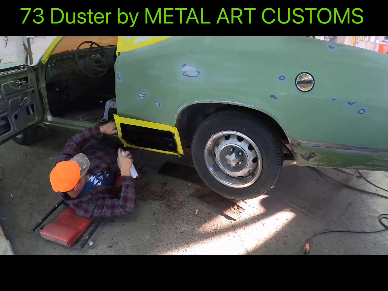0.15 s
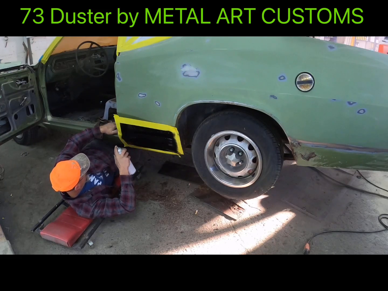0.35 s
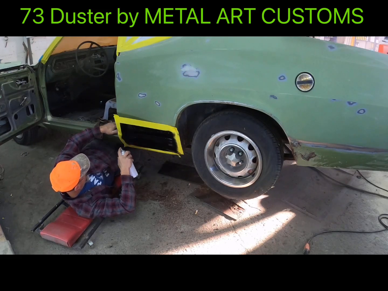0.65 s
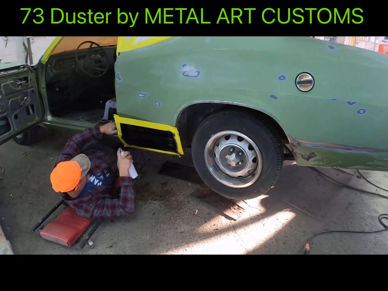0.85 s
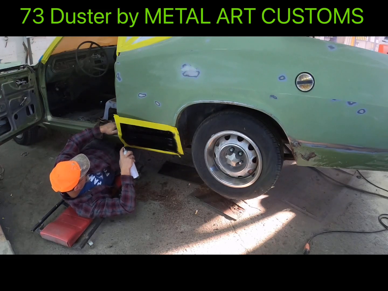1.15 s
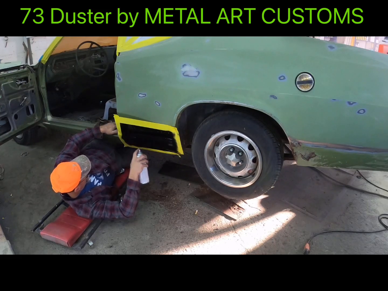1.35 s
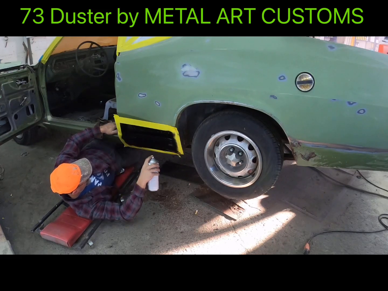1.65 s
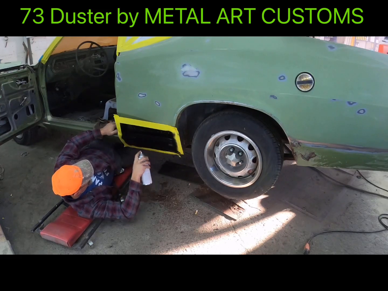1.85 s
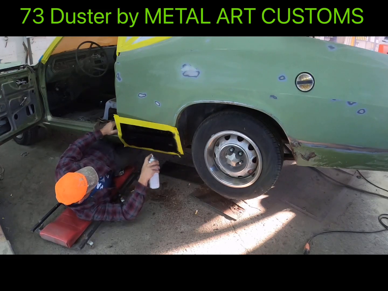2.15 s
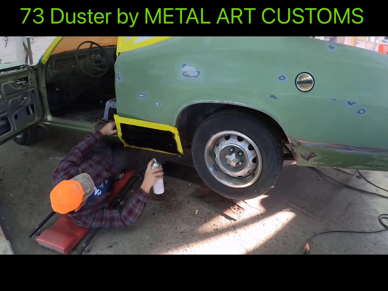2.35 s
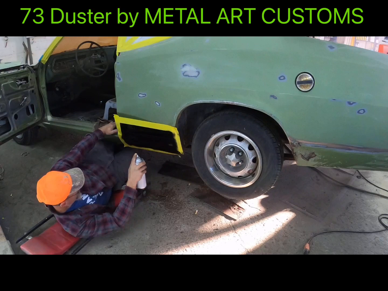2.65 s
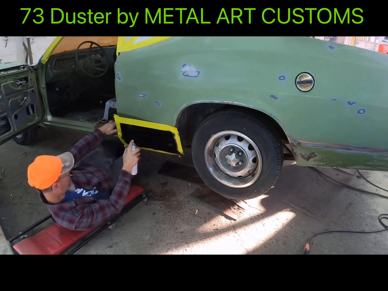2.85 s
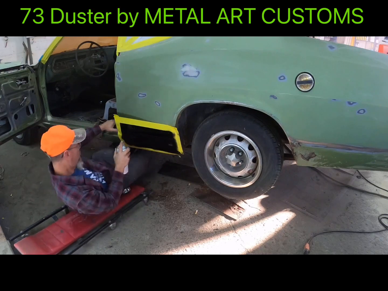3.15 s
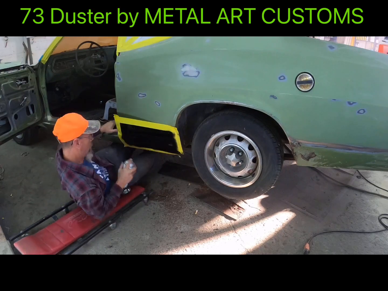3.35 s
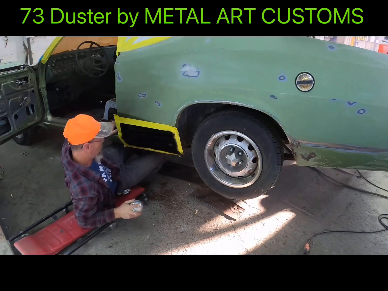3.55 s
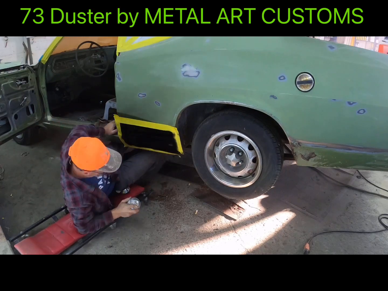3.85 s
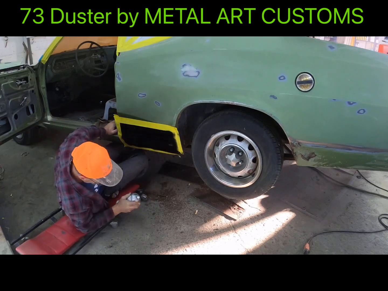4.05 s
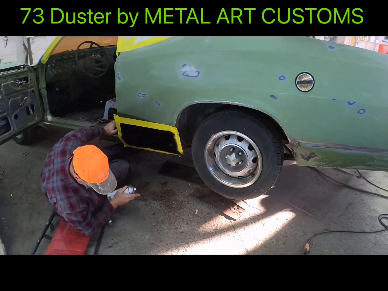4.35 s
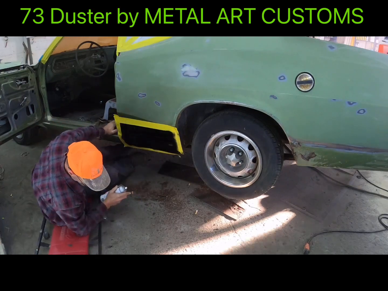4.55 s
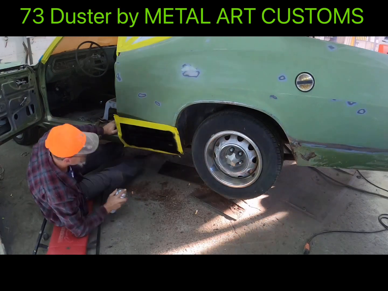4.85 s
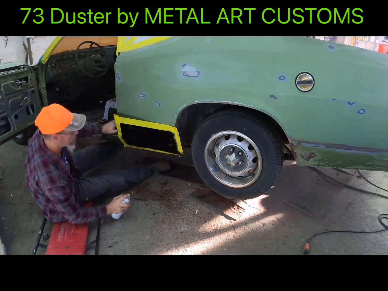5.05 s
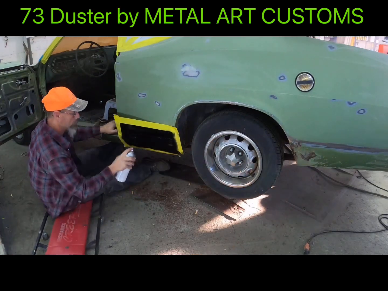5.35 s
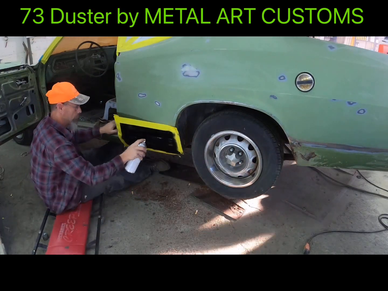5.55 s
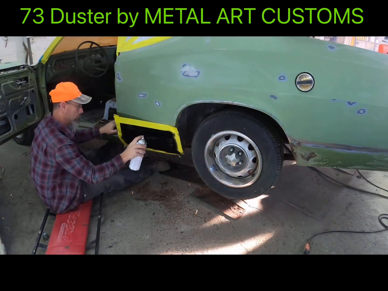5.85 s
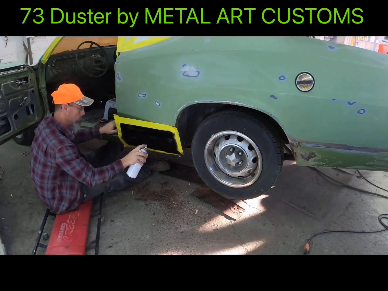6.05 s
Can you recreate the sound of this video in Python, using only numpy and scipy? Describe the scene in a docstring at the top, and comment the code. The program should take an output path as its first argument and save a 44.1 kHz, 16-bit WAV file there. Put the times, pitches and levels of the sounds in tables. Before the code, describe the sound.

Aerosol puffs between quiet pauses, two loud bouts of caster rumble and knocks on gritty floor, a hollow clack, steel chatter, three final sprays.

```python
"""Spray-can bursts on a car's side panel in a hard-walled garage: noise coloured by jet and panel, gated by a valve.
Between them a mechanic's creeper rolls on gritty concrete: random jolts through its board, bumps and drones.
Its frame knocks, scrapes and ticks as clusters of damped modes; a hollow part clacks and steel clangs as damped sines.
The car body booms in low wavering sines. Behind lie room noise, mains hum, puffs of draught and a soft hiss."""
import sys
import numpy as np
from scipy import signal
from scipy.fft import rfft, irfft, next_fast_len
from scipy.io import wavfile
from scipy.ndimage import uniform_filter1d, map_coordinates

SR = 44100
rng = np.random.default_rng(int(sys.argv[2]) if len(sys.argv) > 2 else 0)


def store_wav(level_fs):
    """Save 16-bit WAV to argv[1]."""
    pcm = np.round(np.clip(np.atleast_2d(level_fs), -1, 1) * 32767)
    wavfile.write(sys.argv[1], SR, pcm.T.astype(np.int16))


N = 272959

# microphone ports: f/Hz, left minus right/dB
PORT_SHADING = [(50, 11.5), (130, -2), (400, -3), (1100, 0.5), (2700, 3), (5300, 0.5), (7600, 3.5),
                (8500, -3.5), (9400, -2.5), (11000, -1), (15000, -4)]
# fading top of the microphones: f/Hz, level/dB
MIC_TREBLE = [(12500, -1.5), (13300, -7), (14200, -15), (15800, -21)]
# walls' decay: f/Hz, t60/s
WALL_DECAY = [(80, 0.94), (250, 0.68), (1000, 0.95), (4000, 0.68), (8000, 0.41), (14000, 0.2)]
# diffuse sound, left-right correlation: f/Hz, likeness/1
LIKENESS = [(100, 0.53), (500, 0.94), (1500, 0.71), (3500, 0.43), (6000, 0.048), (14000, 0.067)]
# room noise spectrum: f/Hz, density/dB per Hz
ROOM_COLOUR = [(20, -24), (40, -24), (60, -3), (90, -20), (140, 0), (240, -13), (550, -27), (1500, -12.5),
               (4000, -41)]
# soft hiss spectrum: f/Hz, density/dB per Hz
HISS_SPECTRUM = [(410, -7.5), (700, -8), (766, -14), (848, 0), (1630, 2), (3020, 3.5), (6950, -5),
                 (12400, -23.5), (15000, -26)]
# draught on the microphones: t of peak/s, level/dB
DRAUGHT_PUFFS = [(.66, -42.5), (1.25, -35), (2.34, -46)]
# leaned-on car panel: t of start/s, t of end/s, level/dB, pitch f/Hz
PANEL_BOOMS = [(0.645, 0.685, -42, 67.5), (0.858, 0.954, -30.5, 147.5), (0.868, 1.015, -28.5, 81.7),
               (1.125, 1.154, -37.5, 69), (1.262, 1.303, -35.5, 160.7), (4.085, 4.149, -37, 127),
               (5.085, 5.13, -37, 116)]
# panel modes: multiple of pitch/1, level/dB
PANEL_MODES = [(1, 2.5), (1.42, -13.5)]
# steel contacts: t/s, ring level/dB (6 dB is taken off in clang), clash level/dB
STEEL_CONTACTS = [(5.0744, -35, -22.5), (5.094, -35, -24.5), (5.107, -38, -25.5), (5.132, -41, -35),
                  (5.15, -55, -38), (5.197, -46.5, -40), (5.246, -43, -30.5), (5.395, -57, -40)]
# steel modes: f/Hz, mean level/dB, t60/s
STEEL_MODES = [(846, -1, 0.48), (922.8, 9, 0.57), (990, 3.5, 0.58), (1031, -3, 0.96), (1053, -1, 0.77),
               (1125, 1, 0.76), (1152, -2.5, 0.87), (1223, -3, 0.61), (1320, -1, .6), (1378, -5, 0.79),
               (1434, 1, .7), (1549, -3, 0.5), (1563, -1.5, 0.73), (2040, -12, .3), (2116, 4, 0.32),
               (2320, 1, 0.39), (2345, -1, .42), (2492, -9, .28), (2900, -3, .45), (3246, -17, .6),
               (3670, -14, .55)]
# steel clash spectrum: f/Hz, density/dB per Hz
CLASH_COLOUR = [(100, -16), (620, -6.5), (950, 0.5), (2400, -6), (4800, -10), (7000, -18), (12000, -24.5),
                (15500, -27)]
# hollow part against the floor: t/s, level/dB
CLACK_CONTACTS = [(4.0697, -13.5), (4.076, -24), (4.091, -21)]
# hollow part's modes: mean f/Hz, level/dB, t60/s
HOLLOW_MODES = [(205, -5, 0.05), (444, -7.5, 0.077), (705, -11, 0.036), (864, -8.5, 0.047),
                (1003, -6, 0.038), (1158, -3.5, 0.051), (1295, -4, 0.032), (1430, -8, 0.029),
                (3310, -14, .015), (5500, -14, .015)]
# small hard parts touching: t/s, level/dB, centre f/Hz, width/octaves
TICK_CONTACTS = [(2.734, -27, 3000, 1), (2.764, -24, 2600, 1.2), (2.872, -28, 3200, 1),
                 (3.156, -26, 4050, 1.05), (3.234, -29, 5000, .5), (3.843, -30, 6900, 1),
                 (3.851, -17.5, 6350, 0.84), (3.886, -43, 7500, .8), (4.1761, -19, 1725, 0.74),
                 (4.184, -17.5, 1300, 1.1), (4.364, -19.5, 3500, 1.9), (4.627, -28.5, 5200, 2.1),
                 (4.7826, -28.5, 3600, 2.3), (4.806, -27.5, 3300, 0.58), (4.912, -32.5, 2490, 1)]
# frame dragging on concrete: t/s, level/dB, rise/s
FRAME_SCRAPES = [(2.71, -30, 0.011), (2.731, -22.5, 0.0023), (2.897, -28.5, .003), (4.308, -29, 0.0019),
                 (4.345, -24, 0.009), (4.363, -24, 0.0033), (4.383, -28, 0.01), (4.806, -30.5, 0.0017)]
# frame and caster contacts: t/s, level/dB, centre f/Hz, width/octaves
FRAME_KNOCKS = [(2.483, -33.5, 1500, 1.5), (2.568, -33, 645, .4), (2.612, -26.5, 1400, 2.4),
                (2.756, -24, 1900, 3.6), (2.852, -19, 3200, 0.11), (3.82, -18, 860, 2.27),
                (3.843, -22.5, 760, 3.4), (3.913, -30.5, 2010, 1.4), (4.177, -25.5, 600, 1),
                (4.396, -20.5, 704, 3.2), (4.445, -23, 2800, 2.6), (4.781, -29.5, 2020, 2.8),
                (4.937, -30.5, 1440, 0.69)]
# juddering caster: t of peak/s, level/dB, mean pitch f/Hz, tenfold rise/s, tenfold fall/s
CASTER_DRONES = [(2.545, -31, 310, .04, .08), (2.648, -19, 345, 0.067, 0.064),
                 (2.775, -20, 440, 0.066, 0.054), (2.862, -19.5, 222, 0.12, 0.034),
                 (4.42, -19.5, 182, 0.05, 0.072), (4.44, -23.5, 615, 0.06, 0.055),
                 (4.488, -16.5, 183.7, 0.17, 0.11), (4.565, -20.5, 240, 0.035, 0.087)]
# caster into a dent or over a ridge: t/s, level/dB
CASTER_BUMPS = [(2.55, -24), (2.628, -21), (2.642, -17), (2.757, -15.5), (2.771, -15), (2.835, -18),
                (2.856, -15.5), (2.957, -20.5), (2.995, -21), (4.4, -12), (4.423, -14), (4.459, -11.5),
                (4.478, -12.5), (4.493, -9), (4.511, -18), (4.556, -11.5)]
# creeper shoves: t of top speed/s, tenfold run-up/s, tenfold coast/s, rumble level/dB, rattle over rumble/dB
CREEPER_SHOVES = [(.47, 0.23, 0.73, -51.5, -14), (0.678, 0.2, 0.96, -49, -12), (1.21, 0.06, 0.24, -46, -2),
                  (1.3, 0.042, 0.21, -39, -13), (1.83, 0.14, 0.57, -46, -8.5),
                  (2.08, 0.17, 0.46, -48.5, 1.5), (2.43, 0.084, 0.13, -45, 1),
                  (2.55, 0.26, 0.053, -34.5, -0.5), (2.637, 0.043, 0.055, -22.5, 3),
                  (2.768, 0.13, 0.16, -21, 3), (2.862, 0.18, 0.13, -24.5, -2),
                  (3.19, 0.13, 0.16, -40, -7.5), (3.7, 0.46, 0.12, -44.5, -2.5),
                  (4.19, 0.3, 0.47, -34.5, 3), (4.435, 0.13, 0.12, -17, -1.5),
                  (4.515, 0.15, 0.19, -22.5, 1.5), (4.946, 0.029, 0.051, -46, 8.5),
                  (5.75, 0.098, 0.58, -57.5, -13)]
# rolling spectrum: f/Hz, density/dB per Hz
ROLLING_COLOUR = [(30, -55), (60, -10), (100, -2.5), (150, 2), (195, 0), (270, 0), (350, 1), (480, -0.5),
                  (720, -7.5), (1000, -9), (1500, -16.5), (3400, -19), (9000, -39.5), (14000, -53)]
# creeper board modes: f/Hz, width/Hz, level/dB
BOARD_MODES = [(182.2, 16, 4), (235, 24, 1), (303, 36, 1), (345.5, 19, 4.5), (438, 56, -1.5),
               (614, 33, -5.5), (720, 49, -4), (902, 23, -9)]
# nozzle presses: t of start/s, t of end/s, mid-press level/dB, valve opening time constant/s,
# tilt/dB per octave, f of strongest panel hiss/Hz
NOZZLE_PRESSES = [(-.05, 0.052, -34.5, .01, -1, 4500), (0.36, 0.463, -37.5, 0.0015, -1.15, 4750),
                  (0.709, 0.843, -37, 0.018, -2, 4230), (1.24, 1.481, -35, 0.013, -1.8, 3750),
                  (1.794, 1.998, -34, 0.011, -2, 3520), (2.185, 2.404, -33.5, 0.034, -1.5, 3140),
                  (3.38, 3.478, -36, 0.016, -2, 4700), (5.66, 5.789, -34, 0.03, -0.7, 3360),
                  (5.8, 5.964, -41.5, 0.039, -8, 7040), (5.974, 6.133, -34, 0.029, -1.1, 2960)]
# jet spectrum before tilt and panel hiss: f/Hz, density/dB per Hz
JET_COLOUR = [(400, -22), (750, -24.5), (1150, -11), (1800, -9), (2500, -4), (3300, -3), (4900, -1),
              (5900, -6), (7500, -5), (9500, -6), (11000, -9.5), (12800, -7.5), (15000, -12.5)]


def amp(db):
    """Decibels to gain."""
    return 10 ** (np.asarray(db) / 20)


def unit(x):
    """Scale to rms 1."""
    return x / np.sqrt(np.mean(x ** 2) + 1e-20)


def along(points, hz):
    """Read (f/Hz, value) points on a log frequency axis."""
    f, value = np.transpose(points)
    return np.interp(np.log(hz + 1), np.log(f + 1), value)


def clock():
    """Time of every sample, in s."""
    return np.arange(N) / SR


def filtered(x, response):
    """Apply a response of frequency by FFT."""
    n = x.shape[-1]
    m = next_fast_len(n + 8192)
    return irfft(rfft(x, m) * response(np.fft.rfftfreq(m, 1 / SR)), m)[..., :n]


def causal(points):
    """Minimum-phase impulse response: a body with this spectrum rings only after it is struck."""
    size = 4096
    cepstrum = irfft(np.log(amp(along(points, np.fft.rfftfreq(size, 1 / SR))) + 1e-6))
    cepstrum[1:size // 2] *= 2
    cepstrum[size // 2 + 1:] = 0
    return irfft(np.exp(rfft(cepstrum)))


def add(track, start_s, sound):
    """Mix a sound into the track at start_s."""
    part = track[round(start_s * SR):][:len(sound)]
    part += sound[:len(part)]


def wobble(rate_hz, size):
    """Smooth random curve with rate_hz knots a second."""
    knots = rng.standard_normal(int(size * rate_hz / SR) + 4)
    return map_coordinates(knots, [np.arange(size) * rate_hz / SR])


def swell(peak_s, rise_s, fall_s):
    """Gain that climbs to 1 at peak_s and dies away, tenfold in each rise_s and fall_s."""
    t = clock() - peak_s
    return 10 ** -np.maximum(-t / rise_s, t / fall_s)


def cluster(size, centre_hz, octaves, skirt=1.87):
    """Crowded modes around one pitch: band noise of rms 1."""
    def band(hz):
        offset = np.log2((hz + 1) / centre_hz) / octaves
        return (1 + offset ** 2) ** -skirt
    return unit(filtered(rng.standard_normal(size), band))


def jolts(rate_hz, spread_db):
    """Randomly timed impulses of either sign and uneven size, rms 1."""
    hits = rng.random(N) < rate_hz / SR
    signs = rng.choice([-1, 1], N)
    sizes = amp(spread_db * np.clip(rng.standard_normal(N), -2, 2))
    return unit(hits * signs * sizes)


def diffuse(two):
    """Two unrelated signals as a close microphone pair hears them: most alike around 500 Hz, unlike in the treble."""
    def mix(hz):
        turn = np.arccos(np.clip(along(LIKENESS, hz), -1, 1)) / 2
        return np.array([np.cos(turn), np.sin(turn)])
    mid, side = filtered(two, mix)
    return np.array([mid + side, mid - side])


def garage(x, wet_db, near_db, near_from_hz=650):
    """Direct sound, quick echoes off floor and car, and the walls' answer, whose treble dies first."""
    hz, t, z = signal.stft(rng.standard_normal((2, SR)), SR, nperseg=256)
    decay = amp(-60 * t / along(WALL_DECAY, hz)[:, None])
    tail = signal.istft(z * decay, SR, nperseg=256)[1]
    age_s = np.arange(tail.shape[1]) / SR
    walls = tail * (1 - np.exp(-age_s / 0.0038))  # echoes build up
    near = rng.standard_normal(tail.shape) * np.exp(-age_s / 0.006)
    # long waves bend around nearby things
    near = filtered(near, lambda hz: hz ** 2 / (hz ** 2 + near_from_hz ** 2))
    echoes = amp(wet_db) * walls / np.linalg.norm(walls[0])
    echoes = echoes + amp(near_db) * near / np.linalg.norm(near[0])
    # the microphones' housing scatters the treble
    direct = filtered(x, lambda hz: (1 + (hz / 6000) ** 4) ** -.5)
    return direct + signal.fftconvolve(x[None], diffuse(echoes), axes=1)[:, :N]


def spots(count, sweep_hz=5):
    """Share of each spot over time as a source passes through them all, sweep_hz times a second."""
    place = count * sweep_hz * clock()
    return [np.maximum(1 - np.abs((place - k) % count - 1), 0) for k in range(count)]


def roaming(x, wet_db, near_db):
    """A moving source meets different echoes at every spot."""
    return sum(garage(x * share, wet_db, near_db) for share in spots(count=3))


def coloured(colour):
    """Diffuse stereo noise of a given spectrum, rms 1."""
    noise = rng.standard_normal((2, N))
    return unit(diffuse(filtered(noise, lambda hz: amp(along(colour, hz)))))


def soft_hiss(full_s=2.15, full_db=-45, fade_db_per_s=34, creep_db_per_s=0.3):
    """Diffuse noise that fades in until full_s, then stays and creeps up."""
    since_s = clock() - full_s
    level_db = full_db + np.minimum(fade_db_per_s * since_s, creep_db_per_s * since_s)
    return amp(level_db) * coloured(HISS_SPECTRUM)


def draught(rise_s=0.13, fall_s=0.52):
    """Puffs of air on the microphones: swelling low-frequency noise."""
    puffs = sum(amp(db) * swell(s, rise_s, fall_s) for s, db in DRAUGHT_PUFFS)
    return puffs * coloured([(8, -10), (22, 0.5), (60, -5.5), (200, -6.5), (1000, -102)])


def background(ambient_db=-60, hum_db=-60, hum_hz=60):
    """Low room noise with a sine of mains hum, draught and the soft hiss."""
    hum = amp(hum_db) * np.sin(2 * np.pi * hum_hz * clock())
    return amp(ambient_db) * coloured(ROOM_COLOUR) + hum + draught() + soft_hiss()


def booms(waver=0.088, judder_db=2, rise_s=0.02, release_t60_s=.16):
    """A leaned-on panel swells into a low, juddering note, which dies quickly once the rubbing stops."""
    out, t = np.zeros(N), np.arange(SR) / SR
    for start_s, end_s, db, pitch_hz in PANEL_BOOMS:
        note = 0
        for multiple, mode_db in PANEL_MODES:
            hz = multiple * pitch_hz * (1 + waver * wobble(55.3, SR))
            note = note + amp(mode_db) * np.sin(2 * np.pi * np.cumsum(hz) / SR)
        release_db = 60 * np.maximum(start_s + t - end_s, 0) / release_t60_s
        level = amp(db - release_db + judder_db * wobble(50.3, SR))
        add(out, start_s, level * (1 - np.exp(-(t / rise_s) ** 2)) * unit(note))
    return out


def clang(clash_t60_s=0.16, blur_rad=1.0):
    """Steel lands and chatters; each contact rings its modes at new strengths, blurred as it rocks on the floor."""
    out, t = np.zeros(N), np.arange(SR * 3 // 4) / SR
    phases = [2 * np.pi * hz * t + blur_rad * wobble(45.5, len(t)) for hz, db, t60_s in STEEL_MODES]
    for s, ring_db, clash_db in STEEL_CONTACTS:
        ring = 0
        for phase, (hz, db, t60_s) in zip(phases, STEEL_MODES):
            level = amp(db + rng.normal(0, 2.3) - 60 * t / t60_s)
            ring = ring + level * np.sin(phase + 2 * np.pi * rng.random())
        clash = unit(filtered(rng.standard_normal(len(t)), lambda hz: amp(along(CLASH_COLOUR, hz))))
        add(out, s, amp(ring_db - 6.0) * ring + amp(clash_db - 60 * t / clash_t60_s) * clash)
    return out


def clacks(crack_db=-6, crack_s=0.0033, crack_hz=3400, scatter=.05):
    """A hard, hollow part hits and rebounds: a sharp contact, then damped modes that shift with each impact."""
    out, t = np.zeros(N), np.arange(SR // 4) / SR
    for s, level_db in CLACK_CONTACTS:
        ring = 0
        for hz, db, t60_s in HOLLOW_MODES:
            shifted_hz = hz * (1 + scatter * rng.uniform(-1, 1))
            ring = ring + amp(db - 60 * t / t60_s) * np.sin(2 * np.pi * (shifted_hz * t + rng.random()))
        crack = amp(crack_db) * np.exp(-t / crack_s) * cluster(len(t), crack_hz, octaves=1.6)
        add(out, s, amp(level_db) * (ring + crack))
    return out


def ticks(t60_s=0.014):
    """Small hard parts touch: a crisp contact that dies almost at once."""
    out, t = np.zeros(N), np.arange(SR // 8) / SR
    for s, db, centre_hz, octaves in TICK_CONTACTS:
        add(out, s, amp(db - 60 * t / t60_s) * cluster(len(t), centre_hz, octaves))
    return out


def scrapes(centre_hz=1950, octaves=1.68, t60_s=0.18):
    """The frame catches on the floor with a short, bright rasp."""
    out, t = np.zeros(N), np.arange(SR // 3) / SR
    for s, db, rise_s in FRAME_SCRAPES:
        level = amp(db - 60 * t / t60_s) * (1 - np.exp(-t / rise_s))
        add(out, s, level * cluster(len(t), centre_hz, octaves))
    return out


def knocks(crack_db=-3, crack_s=0.0055, crack_octaves=1.15, ring_cycles=64, hard_db=-20,
           thud_db=-24.5, thud_db_per_db=1.27, thud_hz=310, thud_octaves=1.87, thud_t60_s=0.34):
    """A contact cracks, then rings damped modes; a hard one that excites a wide band also thuds in the board."""
    out, t = np.zeros(N), np.arange(SR // 3) / SR
    for s, db, centre_hz, octaves in FRAME_KNOCKS:
        # 60 dB in ring_cycles: low and long for the frame, high and short for a caster
        ring = amp(-60 * t * centre_hz / ring_cycles) * cluster(len(t), centre_hz, octaves)
        crack = amp(crack_db) * np.exp(-t / crack_s) * cluster(len(t), centre_hz, crack_octaves)
        # thud_db holds for a knock of hard_db, one octave wide
        blow_db = thud_db + thud_db_per_db * (db - hard_db)
        thud_level = np.sqrt(octaves) * amp(blow_db - 60 * t / thud_t60_s)
        thud = thud_level * cluster(len(t), thud_hz, thud_octaves)
        add(out, s, amp(db) * (ring + crack) + thud)
    return out


def drones(waver=0.0346, judder_db=2.5, overtone_db=-13):
    """A dragged caster judders: the board swells into a rough, unsteady note with a weak octave."""
    out = np.zeros(N)
    for s, db, hz, rise_s, fall_s in CASTER_DRONES:
        phase = 2 * np.pi * np.cumsum(hz * (1 + waver * wobble(70, N))) / SR
        note = unit(np.sin(phase) + amp(overtone_db) * np.sin(2 * phase))
        out += amp(db + judder_db * wobble(90, N)) * swell(s, rise_s, fall_s) * note
    return out


def bumps(soft_hz=2500, contact_s=0.0039, ring_db=-10, ring_t60_s=0.15):
    """Each bump is a short, dull blow through the loaded board, which rings briefly."""
    out, t = np.zeros(N), np.arange(SR // 4) / SR
    board = causal([(hz, db - 20 * np.log10(1 + (hz / soft_hz) ** 2)) for hz, db in ROLLING_COLOUR])
    for s, db in CASTER_BUMPS:
        contact = rng.standard_normal(len(t)) * np.exp(-t / contact_s)
        blow = signal.fftconvolve(contact, board)[:len(t)]
        ring = unit(sum(amp(mode_db + rng.normal(0, 4.1)) * np.sin(2 * np.pi * hz * t)
                        for hz, width_hz, mode_db in BOARD_MODES))
        add(out, s, amp(db) * (blow / np.abs(blow).max() + amp(ring_db - 60 * t / ring_t60_s) * ring))
    return out


def board_response(hz):
    """Parallel resonances of the creeper's board, of alternating sign."""
    total = 0
    for k, (centre_hz, width_hz, db) in enumerate(BOARD_MODES):
        damping = 1j * hz * width_hz
        total = total + (-1) ** k * amp(db) * damping / (centre_hz ** 2 - hz ** 2 + damping)
    return total


def creeper(board_db=-2, split_hz=280, grit_db=-17, chatter_db=2.5):
    """Shoves speed up, then coast; casters jolt on concrete: the board rumbles, the frame rattles, grit is crushed."""
    pushes = np.array([amp(db) * swell(s, run_up_s, coast_s)
                       for s, run_up_s, coast_s, db, rattle_db in CREEPER_SHOVES])
    rumble = np.linalg.norm(pushes, axis=0)
    rattle = np.linalg.norm(pushes * amp([[shove[-1]] for shove in CREEPER_SHOVES]), axis=0)
    rolling = unit(signal.fftconvolve(jolts(rate_hz=900, spread_db=3), causal(ROLLING_COLOUR))[:N])
    board = unit(filtered(jolts(rate_hz=500, spread_db=2.5), board_response))
    body = rolling + amp(board_db) * board
    low = filtered(body, lambda hz: 1 / (1 + (hz / split_hz) ** 6))
    grit_colour = [(300, -22), (900, -2.0), (3000, -6.0), (9000, -7.5), (15000, -17.0)]
    grit = unit(signal.fftconvolve(jolts(rate_hz=300, spread_db=5.5), causal(grit_colour))[:N])
    chatter = unit(amp(chatter_db * wobble(70, N)))  # the frame catches and slips
    return rumble * unit(low) + rattle * chatter * (unit(body - low) + amp(grit_db) * grit)


def spray(drift_db=0.32, splash_db=2.0, splash_octaves=0.18, valve_shut_s=0.0083, sag_ends_db=2.5):
    """The jet hisses while the valve is open, most in mid-press; colour and echoes drift as the hand sweeps it."""
    out, t = np.zeros(N), clock()
    z = signal.stft(rng.standard_normal(N), nperseg=512)[2]
    patches = uniform_filter1d(rng.standard_normal(z.shape), size=6, axis=0)
    patches = uniform_filter1d(patches, size=14, axis=1)
    turbulence = signal.istft(z * amp(drift_db * unit(patches)), nperseg=512)[1][:N]
    for start_s, end_s, db, open_s, tilt_db, splash_hz in NOZZLE_PRESSES:
        def jet_response(hz):
            octave = np.log2((hz + 1) / splash_hz)
            panel_db = splash_db * np.exp(-(octave / splash_octaves) ** 2)
            return amp(along(JET_COLOUR, hz) + tilt_db * octave + panel_db)
        jet = unit(filtered(turbulence, jet_response))
        opening = 1 - np.exp(-np.maximum(t - start_s, 0) / open_s)
        closing = np.exp(-np.maximum(t - end_s, 0) / valve_shut_s)
        sag_db = sag_ends_db * np.interp(t, [start_s, end_s], [-1, 1]) ** 2
        out += amp(db - sag_db) * opening * closing * jet
    return roaming(out, wet_db=0.0, near_db=2.0)


def scene():
    """Sum of all sources in the one garage."""
    booming = garage(booms(), wet_db=-13.5, near_db=-12.0)
    steel = garage(clang(), wet_db=1.5, near_db=4)
    clacking = garage(clacks(), wet_db=-4.0, near_db=-10)
    ticking = garage(ticks(), wet_db=-7, near_db=-8)
    knocking = garage(knocks() + scrapes(), wet_db=-4.5, near_db=-16)
    droning = garage(drones(), wet_db=-11.5, near_db=-12)
    rolling = roaming(creeper() + bumps(), wet_db=-4.5, near_db=1.5)
    return background() + booming + steel + clacking + ticking + knocking + droning + rolling + spray()


def record(dry, top_hz=15800):
    """Two microphone ports colour the sides differently; the treble fades and nothing passes above top_hz."""
    sides = np.array([[.5], [-.5]])
    return filtered(dry, lambda hz: amp(sides * along(PORT_SHADING, hz) + along(MIC_TREBLE, hz)) * (hz < top_hz))


dry = scene()
out = record(dry)
store_wav(out)
```